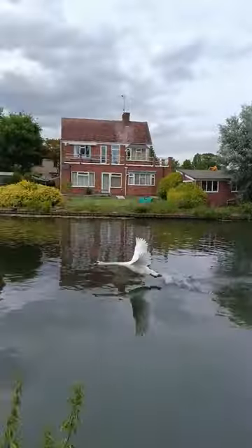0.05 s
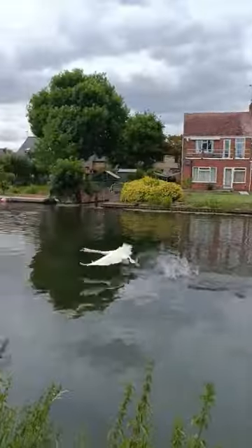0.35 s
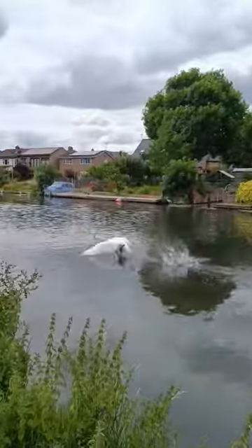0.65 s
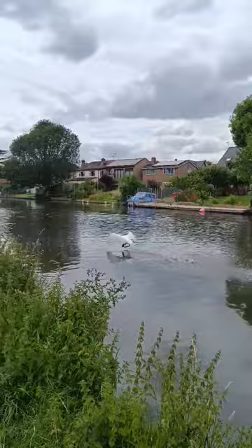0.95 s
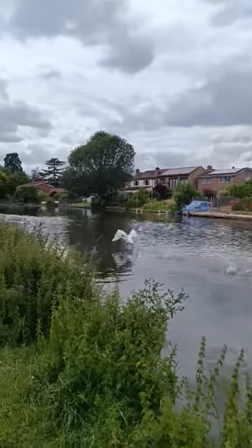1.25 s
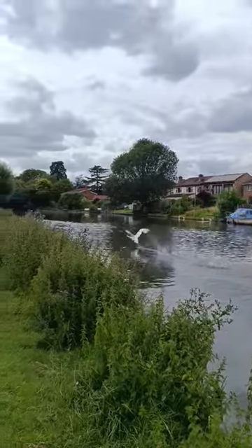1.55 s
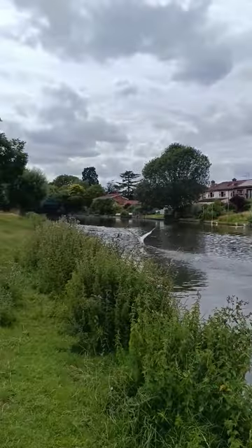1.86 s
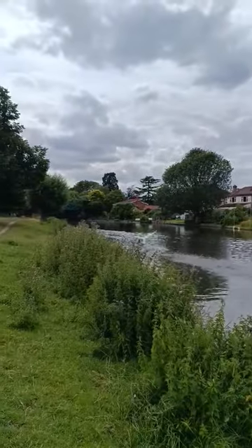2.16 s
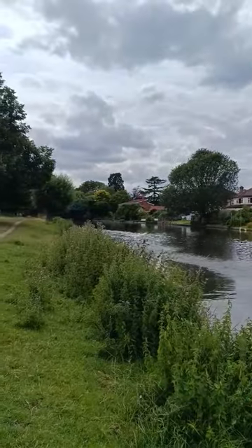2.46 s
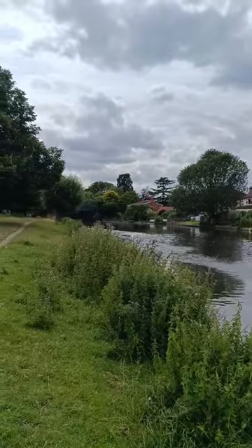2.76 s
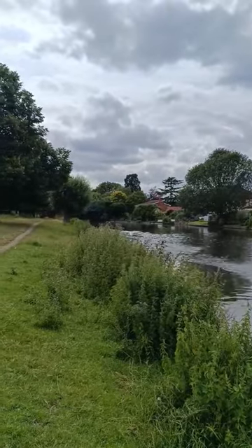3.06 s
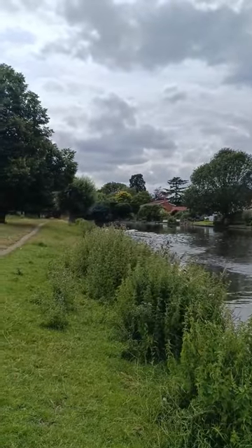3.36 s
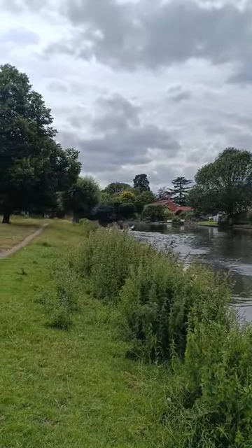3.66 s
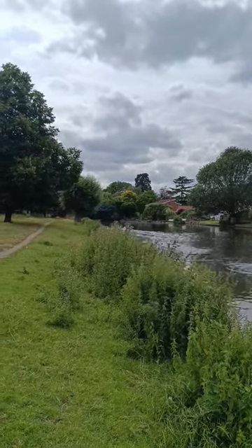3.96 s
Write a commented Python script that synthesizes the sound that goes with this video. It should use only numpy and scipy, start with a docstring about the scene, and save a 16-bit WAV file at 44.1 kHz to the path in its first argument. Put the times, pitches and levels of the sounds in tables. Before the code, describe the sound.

A swan's feet slap the water as it runs off, with wind buffeting the microphone.

```python
"""Feet slap the water in pairs, nearly four strides a second: a swan runs along a river to take off,
heard from the bank. Each slap cracks and rings a pocket of trapped air; the hollows left behind close
with a plop and spray patters down. The bird recedes behind the reeds while gusts buffet the two
microphone ports, over a faint rustle of leaves."""
import sys
import numpy as np
from scipy import signal
from scipy.fft import rfft, irfft
from scipy.io import wavfile
from scipy.ndimage import uniform_filter1d

SR = 44100
rng = np.random.default_rng(int(sys.argv[2]) if len(sys.argv) > 2 else 0)


def wav_out(sig):
    """Save sig, one row per channel (or a flat mono array), as 16-bit PCM at SR to the path in sys.argv[1]."""
    wavfile.write(sys.argv[1], SR, np.round(np.clip(np.atleast_2d(sig).T, -1, 1) * 32767).astype(np.int16))


N = 176400
TIME = np.arange(N) / SR

# Foot slaps: t/s, level/dB, pocket f/Hz, smack f/Hz, smack trim/dB, crack trim/dB, crack decay/s
SLAPS = [(.088, 2.5, 787, 1810, -14, -26.5, 0.0015), (0.1157, 0.5, 820, 1220, -13, -26, 0.0036),
         (0.3404, -2.5, 820, 1880, -10.5, -22, 0.0013), (.370, 0, 838, 1220, -15, -19, 0.00066),
         (0.6004, -3.5, 755, 2120, -7.5, -15.5, 0.00043), (.632, -1, 674, 1920, -11, -19, 0.0019),
         (.851, -7, 725, 2040, -18, -21.5, 0.00085), (0.8884, -6.5, 620, 1260, -8.5, -14.5, 0.0023),
         (1.1275, -3.5, 880, 2175, -16.5, -14.5, 0.00094), (1.1608, 1.5, 790, 1430, -21.5, -21, 0.0012),
         (1.4118, 3.5, 780, 2160, -24, -22, 0.001), (1.446, -3.5, 753, 2200, -15, -18.5, 0.0024),
         (2.036, -7.5, 700, 2140, -9.5, -15.5, 0.00053), (2.057, -8.5, 770, 1560, -27, -16.5, 0.0005),
         (2.28, -19.5, 790, 2200, -5, -11, 0.00094), (2.5432, -11.5, 876, 2350, -14, -19.5, 0.00079)]
# Crack spectra, in the open and behind the reeds: f/Hz, level/dB
OPEN_CRACK_SPECTRUM = [(200, -7.5), (420, -5), (620, 6.5), (900, 1.5), (1300, -2.5), (2200, 1.5),
                       (2800, -5), (4300, -3), (5200, -9), (6100, -5), (7400, -13), (9000, -1),
                       (11000, -15.5), (15000, -26)]
FAR_CRACK_SPECTRUM = [(200, -8), (700, 3.5), (2200, -4), (2900, -16), (4200, 5.5), (5200, -2.5), (6200, -2),
                      (7500, -1), (9000, -24), (15000, -56)]
# Crack heard through the reeds: t/s, share/1
BEHIND_REEDS = [(1.3, 0.08), (2.0, 0.44)]

def slaps():
    """Each foot cracks, smacks, rings a trapped air pocket and throws a sheet of water. Mid, side."""
    contact_s, pocket_t60_s, smack_t60_s, sheet_decay_s = 0.001001, 0.02, 0.015, 0.0069
    rings, cracks, t = np.zeros(N), np.zeros((2, N)), TIME[:SR // 10]
    age = np.maximum(t - contact_s, 0)
    glide = 1 + 0.082 * (1 - 2 * np.exp(-2 * np.pi * age / pocket_t60_s))  # pocket pitch rises
    for start_s, db, pocket_hz, smack_hz, smack_db, crack_db, crack_decay_s in SLAPS:
        phase = 2 * np.pi * np.cumsum(pocket_hz * glide * (age > 0)) / SR
        pocket = from_db(-6 - 60 * age / pocket_t60_s) * np.sin(phase)
        smack = from_db(4 + smack_db - 60 * age / smack_t60_s) * np.sin(2 * np.pi * smack_hz * age)
        add(rings, start_s, from_db(db) * (pocket - smack))
        sheet = from_db(-9) * np.exp(-age / sheet_decay_s)
        burst = np.minimum(t / contact_s, 1) ** 2 * (np.exp(-age / crack_decay_s) + sheet)
        add(cracks, start_s, from_db(db + crack_db + 6.5) * burst * rng.standard_normal((2, len(t))))
    far = in_time(BEHIND_REEDS)
    mid, side = colour(cracks * (1 - far), OPEN_CRACK_SPECTRUM) + colour(cracks * far, FAR_CRACK_SPECTRUM)
    return np.array([mid + low_cut(rings, hz=330, order=2), side])


# Closing hollows: t/s, level/dB, f/Hz, rise/s
PLOPS = [(.179, -20, 724, 0.0034), (.228, -28.5, 680, 0.0044), (.437, -18.5, 722, .005),
         (.447, -22, 840, 0.0028), (.469, -23.5, 668, 0.0075), (.488, -25.5, 636, 0.0054),
         (.520, -23.5, 775, 0.0014), (.697, -26.5, 810, 0.0013), (.853, -35, 616, 0.0019),
         (.964, -21.5, 819, 0.0037), (1.229, -26, 800, 0.0022), (1.58, -31.5, 720, 0.0071),
         (1.775, -32, 760, 0.002)]
# Churning water: f/Hz, level/dB
CHURN_SPECTRUM = [(400, -4.5), (750, 9), (1200, -1), (2000, 1), (2800, -7.5), (5000, -19), (9000, -13),
                  (15000, -34)]

def plops():
    """Large bubbles swell and ring, rising in pitch, while the water churns round them. Mid, side."""
    glide_per_s = 2.7
    rings, churn, t = np.zeros(N), np.zeros(N), TIME[:SR // 10]
    for start_s, db, hz, rise_s in PLOPS:
        phase = 2 * np.pi * hz * t * (1 + glide_per_s * t / 2)
        add(rings, start_s, from_db(db) * swell(t, rise_s) * np.sin(phase))
        add(churn, start_s, from_db(db - 9.5) * swell(t, rise_s=0.0055))
    mid, side = colour(churn * rng.standard_normal((2, N)), CHURN_SPECTRUM)
    return np.array([rings + mid, side])


# Falling spray: t/s, level/dB
SPRAY_LEVEL = [(0, -35.5), (.19, -37), (.28, -36), (.46, -34), (.57, -35.5), (.76, -42.5), (.95, -35),
               (1.1, -38.5), (1.22, -38), (1.36, -38.5), (1.5, -36.5), (1.65, -41.5), (2.1, -41.5),
               (2.25, -46.5), (2.6, -45), (3.0, -57), (4, -58.5)]
# Clumps of water landing: t/s, level/dB, decay/s
CLUMPS = [(0.141, -32.5, 0.062), (0.202, -23, 0.003), (0.374, -24, 0.0096), (0.564, -34, .006),
          (0.949, -36, 0.021), (1.035, -48, 0.0052), (1.563, -31, 0.0034), (1.731, -36, 0.0072),
          (1.942, -31, 0.0053), (2.361, -38, 0.027), (2.463, -41, 0.0043), (2.543, -19, 0.0025),
          (2.581, -37.5, 0.0044)]
# Spray and clump spectra: f/Hz, level/dB
SPRAY_SPECTRUM = [(450, -0.5), (750, 5), (1100, -2.5), (1400, 0), (1900, 0.5), (2300, -0.5), (2700, -8.5),
                  (4200, -5.5), (5200, -10), (6100, -8.5), (7400, -13.5), (9000, -11), (11000, -14.5),
                  (15000, -28.5)]
CLUMP_SPECTRUM = [(800, -7), (2000, 3.5), (4300, 6.5), (7300, 0.5), (9300, 9.5), (15000, -19)]

def spray():
    """Drops of uneven size land over a fine hiss, now and then in a clump. Mid, side."""
    drops = grains(per_s=1700, spread_db=2)
    mist = from_db(-2.5) * rng.standard_normal((2, N))
    flicker_db = 2.07 * drift(rate_hz=34)
    patter = from_db(in_time(SPRAY_LEVEL) + flicker_db) * rms_one(drops + mist)
    clumps = np.zeros(N)
    for start_s, db, decay_s in CLUMPS:
        add(clumps, start_s, from_db(db) * np.exp(-TIME[:SR // 5] / decay_s))
    return colour(patter, SPRAY_SPECTRUM) + colour(clumps * rng.standard_normal((2, N)), CLUMP_SPECTRUM)


# Droplet ticking: t/s, level/dB
DROPLET_LEVEL = [(0, -48), (.2, -48), (.45, -44), (.75, -53), (1.0, -49), (1.5, -50), (1.9, -49.5),
                 (2.25, -60), (2.6, -62), (3.0, -64), (4, -73)]
# Tick spectrum: f/Hz, level/dB
DROPLET_SPECTRUM = [(6000, -28), (7600, -22), (8900, 6.5), (9900, -2), (11500, -23.5), (15000, -28)]

def droplets():
    """The finest droplets tick high in the treble. Mid, side."""
    return from_db(in_time(DROPLET_LEVEL)) * colour(grains(per_s=700, spread_db=4), DROPLET_SPECTRUM)


# Water balance: f/Hz, left minus right/dB
WATER_PAN = [(500, 6.5), (1500, -1.5), (3000, 0.5), (5000, -3.5), (9000, -8.5), (15000, -10.5)]
# Water left-right likeness: f/Hz, likeness/1
WATER_LIKENESS = [(500, 0.99), (1000, 0.44), (2000, 0.26), (6000, 0.27), (15000, 0.96)]

def from_river(mid, side):
    """Water sounds to left, right: lows lean left, treble right; most diffuse at 2-6 kHz."""
    left_lag_s = 0.00006
    likeness, pan_db = per_bin(WATER_LIKENESS), per_bin(WATER_PAN)
    common = rfft(mid) * np.sqrt((1 + likeness) / 2)
    diffuse = rfft(side) * np.sqrt((1 - likeness) / 2)
    lag = np.exp(-2j * np.pi * np.arange(N // 2 + 1) * SR / N * left_lag_s)
    left = (common + diffuse) * from_db(pan_db / 2) * lag
    right = (common - diffuse) * from_db(-pan_db / 2)
    return irfft(np.array([left, right]), N)


# Wind pressure on each port: t/s, level/dB
WIND_LEFT = [(0, -28.5), (.68, -32), (.78, -43.5), (.86, -22), (.92, -40), (1.0, -34), (1.12, -28.5),
             (1.18, -20.5), (1.22, -38), (1.43, -30), (1.52, -13.5), (1.57, -21), (1.6, -19.5),
             (1.88, -26.5), (2.02, -26.5), (2.06, -14), (2.21, -23.5), (2.28, -29), (2.32, -14),
             (2.38, -21.5), (2.55, -18.5), (2.67, -17.5), (2.74, -17.5), (2.785, -15.5), (2.81, -21.5),
             (2.95, -30), (3.03, -30), (3.06, -45), (3.1, -15.5), (3.43, -28), (3.53, -25), (3.59, -32),
             (3.68, -27.5), (3.77, -33), (3.82, -22.5), (3.99, -18)]
WIND_RIGHT = [(0, -39), (.12, -30), (.18, -34.5), (.25, -22.5), (.31, -36), (.55, -41), (.61, -23.5),
              (.68, -69), (.82, -45), (.89, -31), (.93, -49), (1.44, -37), (1.53, -61), (1.59, -26),
              (1.63, -48), (1.86, -37), (1.93, -26), (1.965, -13.5), (2.0, -18), (2.04, -11), (2.25, -18),
              (2.275, -34), (2.35, -19.5), (2.5, -24.5), (2.62, -13.5), (2.72, -15), (2.82, -19.5),
              (2.95, -14.5), (3.04, -17.5), (3.07, -32.5), (3.6, -38), (3.65, -27), (3.72, -14.5),
              (3.78, -27), (3.83, -17), (3.99, -20)]
# Rumble and flutter spectra: f/Hz, level/dB
RUMBLE_SPECTRUM = [(22, -32), (38, -31), (60, -18), (100, -2), (170, 3), (260, -0.5), (400, -15.5),
                   (600, -40.5), (1000, -41)]
FLUTTER_SPECTRUM = [(150, -14.5), (260, 6), (380, 4.5), (600, -10), (900, -21.5), (1500, -41.5),
                    (3000, -43.5)]

def wind(pressure, tilt_db_per_octave):
    """Eddies hit one port in puffs that rumble; strong gusts add a lumpy, higher flutter."""
    strong_gust_db, flutter_growth, port_limit = -15.5, 1.97, 0.99
    pressure_db, puffs = in_time(pressure), np.minimum(drift(rate_hz=24), 1)
    tilted = [(hz, db + tilt_db_per_octave * np.log2(hz)) for hz, db in RUMBLE_SPECTRUM]
    rumble = evened(colour(rng.standard_normal(N), tilted))
    lumps = rng.standard_normal(N) * from_db(8 * drift(rate_hz=35))
    flutter = evened(colour(lumps, FLUTTER_SPECTRUM))
    flutter_db = -17.5 + flutter_growth * (pressure_db - strong_gust_db) + 5 * puffs
    air = from_db(pressure_db + 4 * puffs) * rumble + from_db(flutter_db) * flutter
    return low_cut(port_limit * np.tanh(air / port_limit), hz=55, order=4)


# Hard eddies: t/s, level/dB, f/Hz, left minus right/dB
BUFFETS = [(.993, -15.5, 223, 18), (1.084, -19, 170, 18), (1.177, -12.5, 200, 20), (1.457, -15, 250, 23),
           (1.509, -11.5, 310, 34), (1.545, -2.5, 480, 29), (1.963, -14, 260, -17), (2.156, 0.5, 445, -42),
           (2.195, -2.5, 230, 25), (2.247, -1, 352, -28), (2.319, -14, 317, 18), (2.620, -6, 477, -16),
           (2.641, -2, 372, -24), (2.692, -3, 440, -20), (2.774, -1, 494, 27), (3.027, -7.5, 210, 9),
           (3.100, -16, 298, 17), (3.158, -5, 317, 25), (3.493, -5.5, 306, 30), (3.525, -4, 181, 32),
           (3.829, -4.5, 470, -33), (3.877, -7.5, 457, 26)]

def buffets():
    """Each hard eddy thumps mainly one port."""
    rise_cycles = 0.4
    out, t = np.zeros((2, N)), TIME[:SR // 20]
    for start_s, db, hz, pan_db in BUFFETS:
        thump = swell(t, rise_cycles / hz) * np.sin(2 * np.pi * hz * t)
        port_db = np.minimum([[pan_db], [-pan_db]], 0)
        add(out, start_s, from_db(db + port_db) * thump)
    return out


# Leaf rustle: f/Hz, level/dB
LEAF_SPECTRUM = [(200, 15.5), (500, -4.5), (850, -0.5), (1150, -2), (1550, 3), (2150, -1.5), (2700, -13),
                 (4000, -10.5), (7000, -16.5), (9000, -19), (11000, -31), (15000, -42)]

def leaves():
    """Steady, far rustle of trees and reeds."""
    level_db, likeness = -46.5, 0.56
    mid, side = colour(rng.standard_normal((2, N)), LEAF_SPECTRUM)
    rustle = np.sqrt(1 + likeness) * mid + np.sqrt(1 - likeness) * np.array([side, -side])
    return from_db(level_db) * rms_one(rustle)


def from_db(db):
    """Decibels to gain."""
    return 10 ** (np.asarray(db) / 20)


def rms_one(x):
    """Scale to rms 1."""
    return x / np.sqrt(np.mean(x ** 2) + 1e-20)


def evened(x, window_samples=1200):
    """Hold the short-term rms at 1."""
    return x / np.sqrt(uniform_filter1d(x ** 2, size=window_samples) + 1e-9)


def in_time(rows):
    """A curve at every sample."""
    return np.interp(TIME, *np.transpose(rows))


def per_bin(points):
    """A spectrum at every frequency bin."""
    hz, value = np.transpose(points)
    return np.interp(np.log(np.arange(N // 2 + 1) * SR / N + 1), np.log(hz), value)


def colour(x, spectrum):
    """Minimum-phase filter of unit power that follows a spectrum and falls away beyond its ends."""
    (low_hz, low_db), (high_hz, high_db) = spectrum[0], spectrum[-1]
    skirted = [(low_hz / 4, low_db - 30), *spectrum, (high_hz * 4, high_db - 50)]
    gain = rms_one(from_db(per_bin(skirted)))
    cepstrum = irfft(np.log(gain), N)
    causal_fold = np.r_[1, np.full(N // 2 - 1, 2), 1, np.zeros(N // 2 - 1)]
    return irfft(rfft(x) * np.exp(rfft(cepstrum * causal_fold)), N)


def low_cut(x, hz, order):
    """High-pass filter."""
    return signal.sosfilt(signal.butter(order, hz, "high", fs=SR, output="sos"), x)


def drift(rate_hz):
    """Slow random wander, rms 1."""
    pole = np.exp(-2 * np.pi * rate_hz / SR)
    return rms_one(signal.lfilter([1], [1, -2 * pole, pole * pole], rng.standard_normal(N + SR))[SR:])


def grains(per_s, spread_db):
    """Random clicks of uneven size, rms 1. Mid, side."""
    sizes = from_db(spread_db * np.minimum(rng.exponential(1, (2, N)), 4))
    signs = rng.choice([-1, 1], (2, N))
    return rms_one(sizes * signs * (rng.random((2, N)) < per_s / SR))


def swell(age, rise_s):
    """Rises to 1 in rise_s, then dies away."""
    u = np.maximum(age, 0) / rise_s
    return u * np.exp(1 - u)


def add(out, start_s, sound):
    """Mix a short sound in at start_s."""
    i = max(int(start_s * SR), 0)
    out[..., i:i + sound.shape[-1]] += sound[..., :N - i]


def scene():
    """The swan on the river, the wind on the ports, the leaves behind."""
    gusts = np.array([wind(WIND_LEFT, tilt_db_per_octave=-3.5), wind(WIND_RIGHT, tilt_db_per_octave=0.5)])
    mid, side = slaps() + plops() + spray() + droplets()
    return from_river(mid, side) + gusts + buffets() + leaves()


def record(dry):
    """Round the highest peaks and cut the top treble."""
    clip_level, cutoff_hz = 0.8, 15400
    rounded = dry / (1 + (dry / clip_level) ** 4) ** .25
    return signal.sosfilt(signal.ellip(10, .1, 80, cutoff_hz, fs=SR, output="sos"), rounded)


dry = scene()
out = record(dry)
wav_out(out)
```